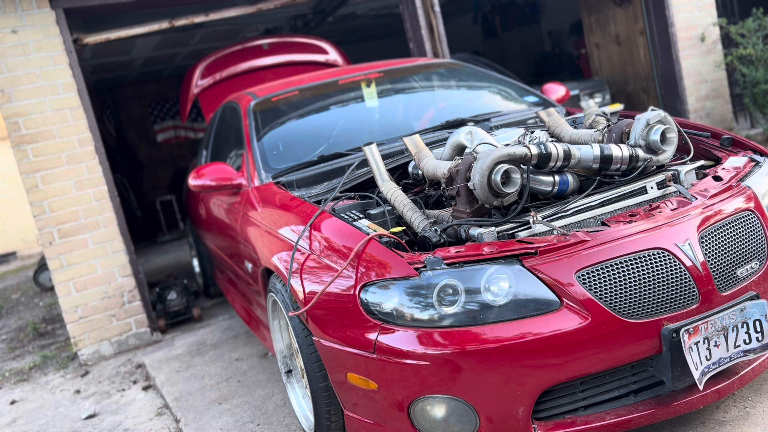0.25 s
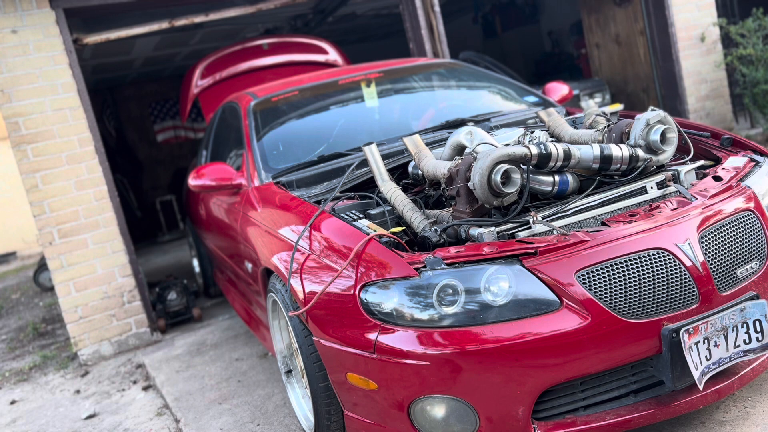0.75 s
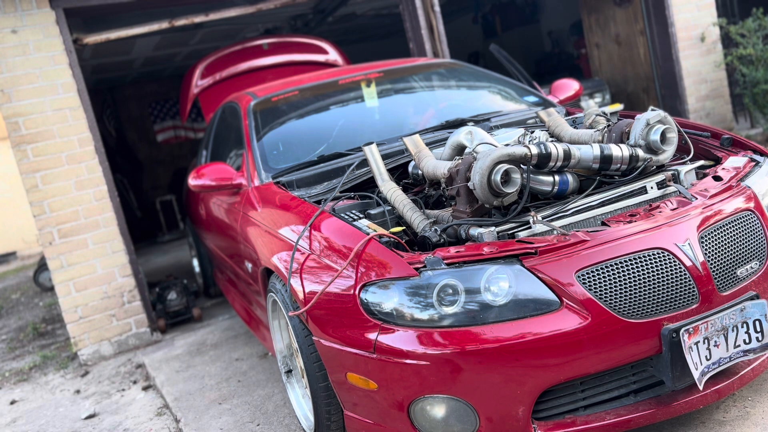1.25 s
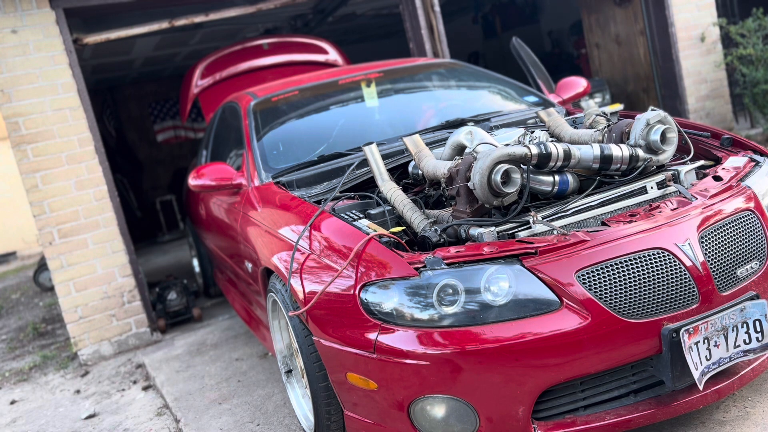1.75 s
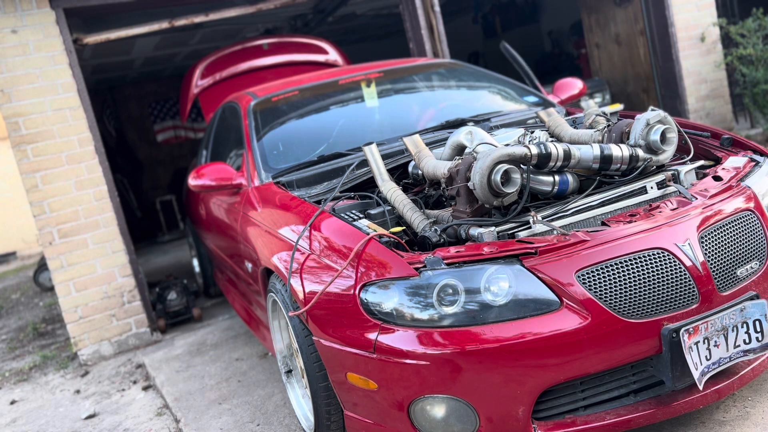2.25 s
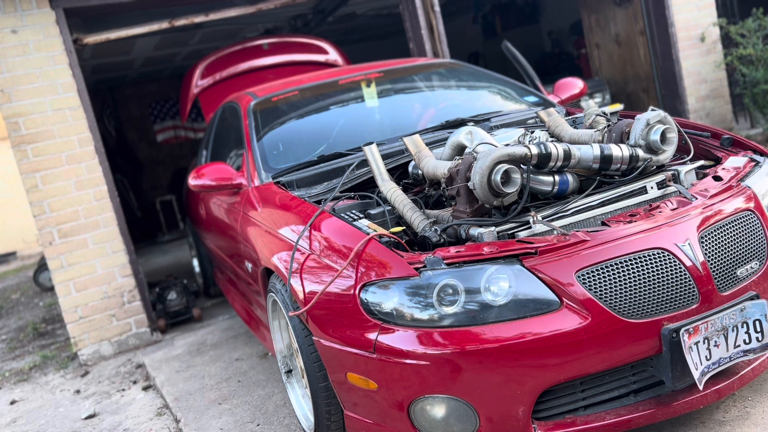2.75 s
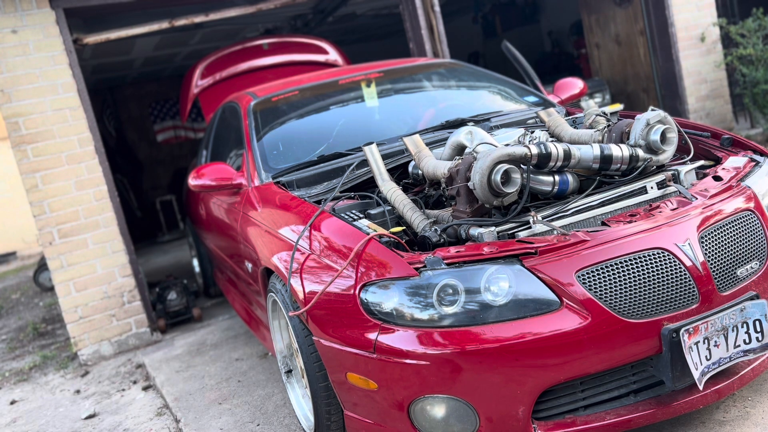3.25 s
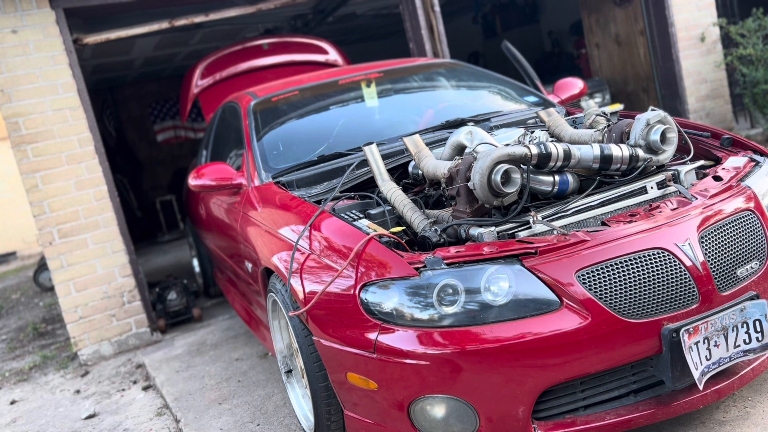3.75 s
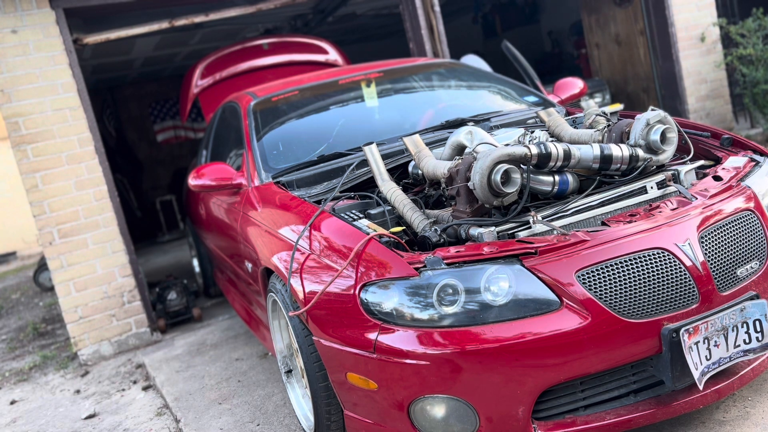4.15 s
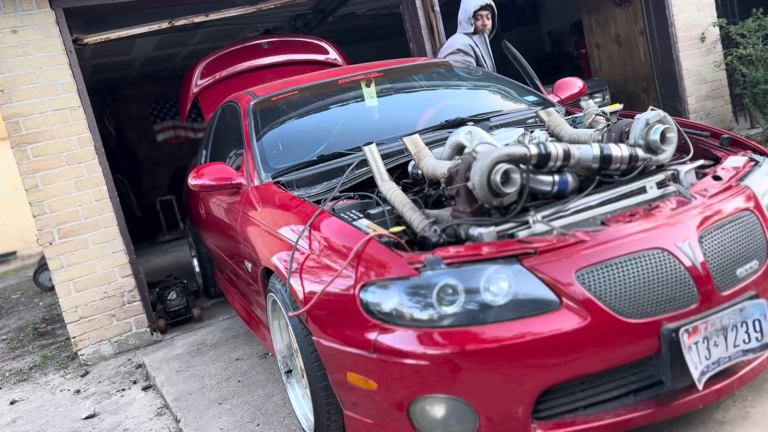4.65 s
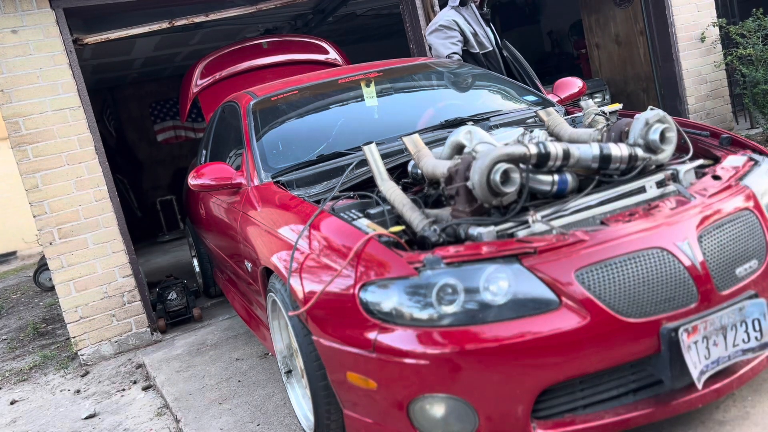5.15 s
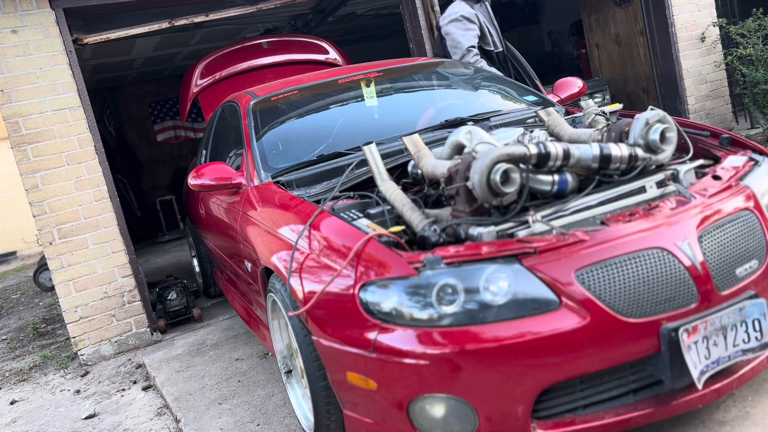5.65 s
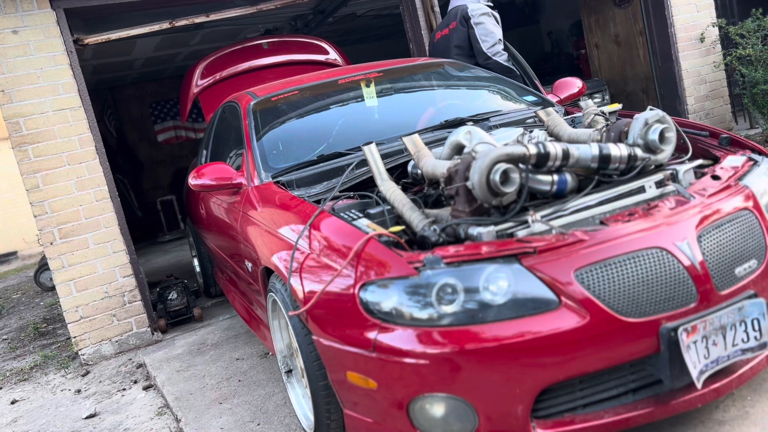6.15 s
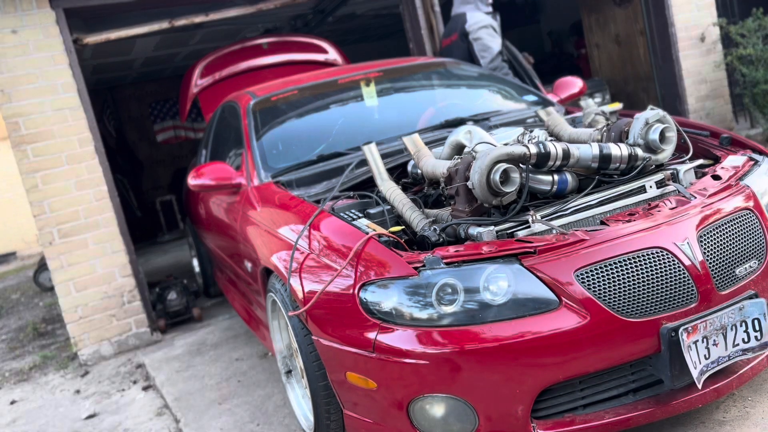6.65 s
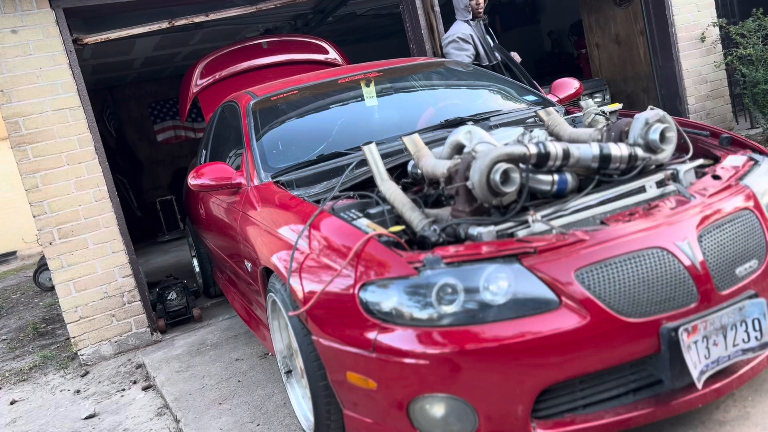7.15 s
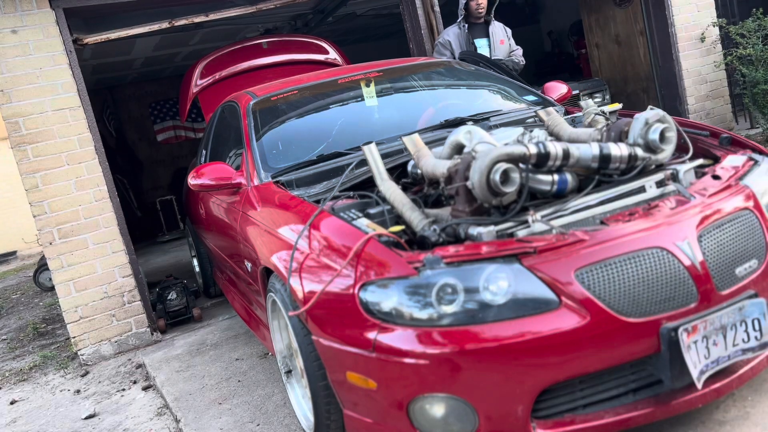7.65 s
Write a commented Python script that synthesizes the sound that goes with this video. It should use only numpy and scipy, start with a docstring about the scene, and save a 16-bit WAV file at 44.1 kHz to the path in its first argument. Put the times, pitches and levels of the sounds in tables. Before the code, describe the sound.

Lumpy idle of a big turbo car engine, thumping and barking from open pipes, sagging briefly and then growing louder.

```python
"""Dry barks and deep thumps in a lumpy rhythm: a turbocharged V8 idles in front of a garage, a few metres
away. The near cylinders bark out of open upswept pipes, ringing the sheet metal, and slugs of gas thump
behind the barks. One cylinder thumps deepest and often misfires; the far bank fills in between.
Underneath lie turbulent rumble, gas hiss, valve ticks and a faint whistle. The idle sags, then catches
and grows louder. Two microphone ports share the bass but hear the treble apart."""
import sys
import numpy as np
from scipy import signal
from scipy.fft import rfft, irfft
from scipy.io import wavfile
from scipy.ndimage import uniform_filter1d

SR = 44100
rng = np.random.default_rng(int(sys.argv[2]) if len(sys.argv) > 2 else 0)


def output_pcm(signal):
    """Save a mono or channel-first signal as 16-bit PCM at the path in sys.argv[1].

    Samples are clipped to [-1, 1] before scaling.
    """
    pcm = np.clip(np.atleast_2d(signal).T, -1, 1) * 32767
    wavfile.write(sys.argv[1], SR, np.round(pcm).astype(np.int16))


N = 348390
T = np.arange(N) / SR
HZ = np.maximum(np.arange(N // 2 + 1) * SR / N, 1)

# the pace of the idle: t/s, four-stroke cycles done
CRANK_CYCLES = [(-.067, 0), (.718, 6), (1.12, 9), (1.404, 11), (1.883, 14), (2.031, 15), (2.17, 16),
                (3.184, 24), (4.335, 33), (4.722, 36), (6.256, 48), (6.638, 51), (7.016, 54), (8.008, 62)]
# engine load, the two faders most layers ride on: t/s, rumble level/dB, gas flow level/dB
ENGINE_LOAD = [(0.0, -25, -40), (1.08, -27, -47), (1.21, -27, -45), (1.56, -32, -46.5), (1.72, -28, -42),
               (2.27, -21.5, -38), (5.74, -20, -37.5), (6.2, -19.5, -37), (7.9, -18, -36)]
# the clearest barks at the pipe mouths: t/s, level/dB, ring f/Hz
CLEAR_BARKS = [(0.0843, -18.5, 1600), (0.1328, -23, 1480), (0.1845, -31.5, 2450), (0.2537, -39.5, 1770),
               (0.2835, -52, 1510), (0.346, -24.5, 2500), (0.398, -21, 1560), (0.4305, -28, 1820),
               (0.5097, -33, 2000), (0.5251, -26, 1480), (0.5771, -33, 2420), (0.6072, -26.5, 1910),
               (0.659, -21, 1420), (0.694, -27, 1460), (0.78, -36.5, 1990), (0.824, -23.5, 2190),
               (0.8725, -36, 2220), (0.9218, -18, 1604), (0.9755, -30.5, 2300), (1.1307, -37, 1550),
               (1.175, -33, 1430), (1.197, -25, 1470), (1.252, -31.5, 2050), (1.3104, -37, 1460),
               (1.4182, -31, 1480), (1.49, -20, 1670), (1.6533, -19.5, 1440), (1.695, -30, 1714),
               (1.838, -32, 2120), (1.855, -22.5, 2100), (1.9095, -16, 1484), (2.0017, -24.5, 2140),
               (2.0543, -17, 1884), (2.108, -16, 1500), (2.14, -19.5, 2210), (2.2357, -15.5, 2400),
               (2.3045, -26, 1590), (2.3623, -15.5, 2510), (2.396, -18, 2160), (2.442, -14, 1660),
               (2.4895, -16.5, 1620), (2.539, -28.5, 2420), (2.618, -16, 1586), (2.6967, -15, 1484),
               (2.7424, -20.5, 1640), (2.7784, -22.5, 2420), (2.823, -16, 2000), (2.871, -15, 2420),
               (2.9046, -23.5, 2230), (2.9701, -43, 1430), (2.9959, -16.5, 1470), (3.0728, -19, 1930),
               (3.1233, -16.5, 1700), (3.1575, -20.5, 2380), (3.202, -14.5, 2110), (3.2504, -22, 1930),
               (3.284, -25.5, 2110), (3.379, -15.5, 2040), (3.449, -21.5, 2530), (3.5402, -24, 2460),
               (3.588, -14, 1900), (3.6359, -16, 1495), (3.713, -21.5, 1640), (3.763, -16.5, 2370),
               (3.795, -21, 1650), (3.8807, -23, 1430), (3.924, -22.5, 2250), (3.969, -17, 1520),
               (4.0176, -17, 2330), (4.101, -16, 1960), (4.15, -19.5, 1880), (4.181, -22, 2100),
               (4.2121, -26, 1470), (4.2738, -15.5, 1490), (4.309, -19.5, 2340), (4.343, -30.5, 2450),
               (4.4026, -15, 1650), (4.5331, -14, 2410), (4.586, -28, 1900), (4.639, -37, 1960),
               (4.6605, -22, 1970), (4.6946, -19.5, 2100), (4.788, -17, 2410), (4.9178, -16, 1830),
               (4.952, -21, 2230), (5.0467, -17, 1450), (5.097, -20.5, 2310), (5.124, -18.5, 2240),
               (5.171, -13.5, 2320), (5.253, -12.5, 1960), (5.298, -16, 1640), (5.366, -27, 1470),
               (5.427, -13.5, 1510), (5.462, -24, 1490), (5.555, -14.5, 1460), (5.592, -18.5, 2390),
               (5.717, -20, 2230), (5.7625, -12, 1665), (5.811, -13, 1460), (5.9394, -25, 1490),
               (5.9732, -22, 1570), (5.9908, -25, 2420), (6.0214, -30, 1600), (6.0686, -13, 2420),
               (6.1032, -20.5, 2270), (6.136, -18.5, 1760), (6.1953, -14.5, 1910), (6.243, -24, 2380),
               (6.2745, -17.5, 1520), (6.321, -20.5, 1445), (6.357, -26, 2020), (6.403, -12.5, 1986),
               (6.452, -14, 2390), (6.485, -18, 2500), (6.5186, -25.5, 1700), (6.599, -22.5, 1470),
               (6.628, -21, 1950), (6.6592, -19, 1540), (6.7042, -13, 2190), (6.7814, -10, 1535),
               (6.829, -16, 1700), (6.943, -26, 1470), (6.9576, -15, 1940), (6.988, -20, 2174),
               (7.019, -20.5, 1640), (7.061, -41, 1630), (7.0786, -19.5, 1540), (7.1292, -28, 2240),
               (7.1593, -10.5, 2100), (7.204, -14, 1490), (7.237, -22.5, 1470), (7.284, -12, 1447),
               (7.3497, -20.5, 1790), (7.4077, -11.5, 2000), (7.5319, -11.5, 1540), (7.5785, -14, 2210),
               (7.611, -20, 2440), (7.7204, -26, 2170), (7.752, -21, 2410), (7.7799, -11, 2125),
               (7.86, -23, 1820)]
# near cylinders when they burn poorly: place/eighths of a cycle, bark level/dB over the gas flow
SOFT_BARKS = [(1.2, -8), (4.2, 1), (6.29, 2), (7.29, 3)]
# far-bank pulses and echoes in the pipes: place/eighths of a cycle, level/dB over the rumble
FAR_PULSES = [(0.899, 5), (2.703, 6), (3.329, 11.5), (4.1, 4), (5.86, 7)]
# how well the far bank burns, cycle by cycle: gain/dB
FAR_BURN = [6, -2, 1.5, 2.5, 5.2, 6.5, 3.5, 0.5, 4.5, 6.5, 4.7, 7, 7, 5.5, 4, 4, 2, -5, -3, -5, -6, 2.5,
            0.5, 0, 1, -1, 1, -3.5, -5, 1, -6, 1.5, -3, -4, 1, 1.2, 2, 1.5, 2.5, -0.5, 2.5, -0.5, 0.5, -5,
            3.5, -0.5, -1, 3, 1, 0.5, -1.5, -.1, -1.5, 2, -4, -4, -2, -4, 1.5, -3, -4.5, -2]
# the deep cylinder cycle by cycle, low where it misfires: level/dB over the rumble
DEEP_BURN = [5, 18.4, 12, 9, 18, 9.9, 15.6, 20.5, 12, 19.4, 14.5, 16, 12, 16, 14, 18, 16, 13, 16.7, 16, 4.4,
             7.8, 8.7, 12.5, 18, 6.7, 11, 19.6, 3.5, 14, 15.7, 16.5, 15, 17, 14.4, 16.5, 5.9, 5.4, 16, 12,
             9.7, 13.6, 18.3, 9.4, 15, 17.8, 5.7, 15.3, 6.5, 4.9, 15.6, 11, 9.7, 19.8, 17, 5.5, 15.7, 8,
             5.1, 14.7, 6.6, 17.5]
# tone curves of the rumble, the barks and the gas hiss: f/Hz, relative level/dB
RUMBLE_EQ = [(40, -9), (60, -7), (110, -13), (160, -2), (200, -5.5), (320, -11), (420, -18.5), (520, -14.5),
             (690, -15), (720, -33), (1200, -45.5)]
BARK_EQ = [(400, -4), (800, -2), (1100, -3.5), (1500, -3.5), (2200, -1), (3000, -3.5), (4500, -9),
           (7500, -7), (10000, -11), (13000, -6.5), (16000, -12)]
FLOW_EQ = [(500, 11), (800, 13), (1500, 7), (2500, 2.5), (4000, -2), (7500, -3), (11000, -31), (16000, -41)]
# sheet-metal and pipe resonances that colour the gas: f/Hz, width/Hz, gain/dB
SHELL_PEAKS = [(785, 41, 9), (959, 38, 12), (1097, 66, 6.5), (1501, 150, 9.5), (1760, 160, -1.5),
               (2454, 110, 5), (2920, 80, 1.5), (3920, 96, 7), (8320, 3200, 5)]
# hollow body of the exhaust, rung by every firing: f/Hz, level/dB, t60/s
BODY_MODES = [(156.1, -16, 0.32), (229, -27, 0.041), (281, -19, 0.078), (343.3, -23, 0.13),
              (484, -16, 0.077), ]
# sheet metal rung by each bark: f/Hz, width/Hz, level/dB
PANEL_MODES = [(955, 33, -15.5), (1080, 60, -12), (1530, 50, -10)]
# how alike the two microphone ports sound: f/Hz, likeness from 0 to 1
PORT_LIKENESS = [(60, .999), (300, .97), (600, .82), (1200, .72), (2000, .68), (3000, .5), (6000, .3),
                 (7500, .4), (8500, .75), (10000, .9), (16000, .9)]
# left port over right: f/Hz, level/dB
PORT_BALANCE = [(30, -3), (60, 0.6), (110, -2.5), (200, -2), (380, -3), (700, -3), (1290, 0.5), (2380, -4),
                (4400, 4.5), (8120, 0), (15000, -0.5)]
# left port ahead of right: f/Hz, phase/rad
PORT_PHASE = [(30, 0), (120, -.1), (520, -.4), (780, 2.9), (1300, 3.8), (2000, 6.2), (2700, 8.6),
              (3500, 8.2), (4500, 13), (7000, 14.6), (8500, 12.6), (10300, 9.42), (12000, 6.28),
              (13800, 3.14), (15500, 0)]


def undb(db):
    """Gain of a level in dB."""
    return 10 ** (np.asarray(db) / 20)


def curve(table):
    """A (f/Hz, value) table drawn across the spectrum on a log axis."""
    hz, value = np.transpose(table)
    return np.interp(np.log(HZ), np.log(np.maximum(hz, 1)), value)


def peak(hz, width_hz):
    """Gain spectrum of one resonance."""
    return 1 / (1 + (2 * (HZ - hz) / width_hz) ** 2)


def noise(gain):
    """Noise with the given gain spectrum, rms 1."""
    x = irfft(rfft(rng.standard_normal(N)) * gain, N)
    return x / x.std()


def wander(rate_hz):
    """A smooth random wobble with a spread near 1."""
    hold = int(SR / rate_hz)
    steps = np.repeat(rng.standard_normal(N // hold + 1), hold)
    return 1.44 * uniform_filter1d(uniform_filter1d(steps, hold), hold)[:N]


def strike(times, gains, shape):
    """The shape triggered at each time with its gain."""
    train, at = np.zeros(N), (np.asarray(times) * SR).astype(int)
    inside = (at >= 0) & (at < N)
    np.add.at(train, at[inside], gains[inside])
    return signal.fftconvolve(train, shape)[:N]


def ring(envelope, hz, width_hz):
    """A noise burst through one resonance, with the energy of its envelope."""
    band = signal.butter(1, [hz - width_hz / 2, hz + width_hz / 2], "band", fs=SR)
    tone = signal.lfilter(*band, envelope * rng.standard_normal(len(envelope)))
    return tone * np.sqrt(np.sum(envelope ** 2) / np.sum(tone ** 2))


def crank_times(eighths):
    """When the crank passes the given places, one row a cycle."""
    crank_s, cycles = np.transpose(CRANK_CYCLES)
    return np.interp(np.arange(cycles[-1])[:, None] + eighths / 8, cycles, crank_s, left=-1)


def shell():
    """Gain spectrum of the metal and pipes around the gas."""
    return undb(sum(db * peak(hz, width) for hz, width, db in SHELL_PEAKS))


def whistle():
    """A faint steady whistle, perhaps a pump."""
    return undb(-61) * noise(peak(5200, width_hz=300))


def gas_hiss(envelope):
    """Flowing exhaust gas, coloured by the metal around it."""
    return envelope * noise(undb(curve(FLOW_EQ)) * shell())


def valve_hiss(floor=0):
    """A broad metallic midrange hiss; the floor opens up its lows and highs."""
    return noise((peak(2120, width_hz=2900) + floor) * shell())


def valve_ticks(flow_db):
    """Valve gear and injectors tick eight times a cycle, a few much louder: hiss envelope, and rings."""
    low_hz, high_hz, t60_s, scatter_db = 1420, 5470, .05, 5.5
    at = crank_times(np.arange(8) + .24).ravel()
    gains = undb(np.interp(at, T, flow_db) - 2.5 + scatter_db * rng.standard_normal(len(at)))
    pitches = low_hz * (high_hz / low_hz) ** rng.random(len(at)) ** 1.67
    t = T[:int(.05 * SR)]
    shape = (1 - np.exp(-t / .003)) * undb(-60 * t / t60_s)
    rings = np.zeros(N + len(t))
    for start, gain, hz in zip(at, gains, pitches):
        if 0 <= start < T[-1]:
            rings[int(start * SR):][:len(t)] += gain * np.sqrt(low_hz / hz) * ring(shape, hz, width_hz=220)
    return strike(at, gains, shape), undb(-5) * rings[:N]


def rumble(rumble_db, thumps):
    """Turbulence in pipes and turbines, swelling with each firing."""
    swell = uniform_filter1d(np.abs(thumps), size=500)
    pumping = .51 + .86 * swell / uniform_filter1d(swell, size=SR // 2)
    return noise(undb(curve(RUMBLE_EQ))) * pumping * undb(rumble_db - 7.5 + .16 * wander(11))


def exhaust_body():
    """The hollow modes of the exhaust bloom as a slug of gas leaves."""
    t = T[:int(.1 * SR)]
    modes = sum(undb(db - 60 * t / t60) * np.sin(2 * np.pi * hz * t) for hz, db, t60 in BODY_MODES)
    return (1 - np.exp(-t / .011)) * modes


def pipe_knock(hz=176, lag_s=.01154, half_length_s=.0044):
    """A short hollow knock of the pipe between bark and thump."""
    t = T[:int(.03 * SR)] - lag_s
    return undb(-11) * np.exp(-(t / half_length_s) ** 2) * np.cos(2 * np.pi * hz * t)


def gas_slug(slug_hz=86, slug_s=.0031, pipe_hz=71.6, rise_s=.26, t60_s=.3):
    """A slug of gas swings the pipe once and a half; a faint hum grows behind it. Peak 1."""
    t = T[:int(.09 * SR)]
    slug = (t / slug_s) ** 3 * np.exp(-t / slug_s) * np.cos(2 * np.pi * slug_hz * t)
    hum = undb(-6 - 60 * t / t60_s) * (1 - np.exp(-t / rise_s)) * np.sin(2 * np.pi * pipe_hz * t)
    return (slug + hum) / np.max(slug + hum)


def far_and_deep_pulses(rumble_db, near_s, first_thump_db):
    """Times and levels of the far bank's pulses and, in the last column, of the deep cylinder."""
    deep_place = 7.84
    place, over_db = np.transpose(FAR_PULSES + [(deep_place, 0)])
    at = crank_times(place)
    even_s = crank_times(np.transpose(SOFT_BARKS)[0]).ravel()
    at = at + np.interp(at, even_s, near_s.ravel() - even_s)  # push and drag with the near bank
    base_db = np.interp(at, T, rumble_db)
    accent_db = first_thump_db - base_db[:, :1]  # the far bank leans on the first near thump
    db = base_db + over_db
    db[:, :-1] += .1 * (accent_db - accent_db.mean()) + np.array(FAR_BURN)[:, None]
    db[:, -1] += DEEP_BURN
    return at, db


def exhaust_thumps(rumble_db, near_s, bark_db, lag_s=.01164, jitter_s=.0005, scatter_db=1.6):
    """The low beat: slugs of gas behind three near cylinders' barks, the far bank and the deep cylinder."""
    bark_s = near_s[:, :3]
    thump_db = -7 + .46 * (bark_db[:, :3] + 15)  # a harder bark brings a heavier thump
    pulse_s, pulse_db = far_and_deep_pulses(rumble_db, near_s, thump_db[:, :1])
    at, db = np.hstack([bark_s + lag_s, pulse_s]), np.hstack([thump_db, pulse_db])
    chance = rng.standard_normal(at.shape + (2,))
    times = (at + jitter_s * chance[..., 1]).ravel()
    gains = undb(db + scatter_db * chance[..., 0]).ravel()
    body_lag_s = .00576 + .00159 * rng.standard_normal(len(times))
    knocks = strike(bark_s.ravel(), undb(thump_db).ravel(), pipe_knock())
    return strike(times, gains, gas_slug()) + strike(times + body_lag_s, gains, exhaust_body()) + knocks


def near_bank(flow_db, scatter_db=3):
    """Bark cues (t/s, level/dB, f/Hz), soft ones filling the gaps; then each firing's time and level."""
    clear_s, clear_db, clear_hz = np.transpose(CLEAR_BARKS)
    place, over_db = np.transpose(SOFT_BARKS)
    at = crank_times(place)
    soft_db = over_db + np.interp(at, T, flow_db) + scatter_db * rng.standard_normal(at.shape)
    soft_hz = rng.uniform(1450, 2450, at.shape)
    apart_s = np.abs(at[..., None] - clear_s)
    nearest, clear = apart_s.argmin(axis=-1), apart_s.min(axis=-1) <= .013
    at = at + np.interp(at, at[clear], (clear_s[nearest] - at)[clear])  # early or late with the barks
    soft = ~clear & (at > 0) & (at < T[-1])
    cues = np.hstack([[clear_s, clear_db, clear_hz], [at[soft], soft_db[soft], soft_hz[soft]]])
    return cues, at, np.where(clear, clear_db[nearest], soft_db)


def pipe_pings(times, db, ring_hz, rise_s=.003, t60_s=.06):
    """The pipe mouth pings: a clear metallic note inside each bark."""
    t, out = T[:SR // 20], np.zeros(N + SR // 20)
    shape = (1 - np.exp(-(t / rise_s) ** 2)) * undb(-2 - 60 * t / t60_s)
    for start, level_db, hz, phase in zip(times - rise_s / 2, db, ring_hz, rng.random(len(times))):
        out[int(start * SR):][:len(t)] += undb(level_db) * shape * np.sin(2 * np.pi * (hz * t + phase))
    return out[:N]


def bark_rings(crack, main_hz, second_hz, sizzle_hz):
    """What one crack of gas sets ringing: two pitches, a thin sizzle and the sheet metal."""
    sizzle = undb(-13) * sum(ring(crack, hz, width_hz=90) for hz in sizzle_hz)
    main = undb(-3) * ring(crack, main_hz, width_hz=260)
    second = undb(-5) * ring(crack, second_hz, width_hz=260)
    panels = sum(undb(db) * ring(crack, hz, width) for hz, width, db in PANEL_MODES)
    return main + second + sizzle + panels


def barks(times, db, ring_hz, second_hz, sizzle_hz):
    """Gas bursts from the pipe mouth: a small leak, a dry ringing crack, then a duller tail."""
    leak_s, crack_s, tail_t60_s, treble_hz, tail_hz = .011, .0058, .11, 3060, 7140
    times, db, t = times - .003, db - 3.5, T[:int(.2 * SR)]
    crack = (t / crack_s) ** .74 * np.exp(-(t / crack_s) ** 2 / 2)
    tail = (1 - np.exp(-t / .0072)) * undb(3 - 60 * t / tail_t60_s)
    colour, treble = undb(curve(BARK_EQ)) * shell(), 1 / (1 + (treble_hz / HZ) ** 4)
    treble_db = db + 1 + .44 * (db - db.max())  # strong barks are brighter
    gas = rfft(noise(colour))
    out = irfft(gas * (1 - treble), N) * strike(times, undb(db), crack)
    out += irfft(gas * treble, N) * strike(times, undb(treble_db), crack)
    out += noise(colour / (1 + (HZ / tail_hz) ** 2)) * strike(times, undb(db), tail)
    out += valve_hiss() * strike(times - leak_s, undb(db - 17), np.hanning(int(2 * leak_s * SR)))
    for start, level_db, *pitches in zip(times, db, ring_hz, second_hz, sizzle_hz):
        tone = bark_rings(crack[:SR // 20], *pitches)
        at = int(max(start, 0) * SR)
        out[at:at + len(tone)] += undb(level_db) * tone[:N - at]
    return out


def microphone_ports(left, other):
    """Stereo width: the right port blends the left's sound with other turbulence, offset in tone and phase."""
    left, likeness = rfft(left), curve(PORT_LIKENESS)
    right = likeness * left + np.sqrt(1 - likeness ** 2) * rfft(other)
    pan, lag = undb(curve(PORT_BALANCE) / 2), np.exp(-1j * curve(PORT_PHASE))
    return np.array([irfft(left * pan, N), irfft(right / pan * lag, N)])


def scene():
    """The idling engine in stereo; turbulence is made twice, since the ports share it only in part."""
    load_s, *faders = np.transpose(ENGINE_LOAD)
    rumble_db, flow_db = (np.interp(T, load_s, fader) for fader in faders)
    cues, near_s, bark_db = near_bank(flow_db)
    thumps = exhaust_thumps(rumble_db, near_s, bark_db)
    tick_envelope, tick_rings = valve_ticks(flow_db)
    gas_envelope = undb(flow_db + 2.5 + 3.53 * wander(60) + 1.02 * wander(24.974))
    sizzle_hz = 1000 * 9 ** rng.random((cues.shape[1], 4))
    second_hz = rng.uniform(1400, 3300, cues.shape[1])
    turbulence, other = (whistle() + gas_hiss(gas_envelope) + tick_envelope * valve_hiss(floor=.027)
                         + rumble(rumble_db, thumps) + barks(*cues, second_hz, sizzle_hz)
                         for _ in range(2))
    return microphone_ports(turbulence + tick_rings + thumps + pipe_pings(*cues), other)


def record(dry):
    """The phone cuts the deepest bass, rounds the loudest peaks and cuts the top."""
    low_hz, top_hz, ceiling = 40, 15800, 1.15
    trimmed = signal.sosfiltfilt(signal.butter(2, low_hz, "high", fs=SR, output="sos"), dry)
    rounded = ceiling * np.tanh(trimmed / ceiling)
    return signal.sosfilt(signal.ellip(10, .2, 80, top_hz, fs=SR, output="sos"), rounded)


dry = scene()
out = record(dry)
output_pcm(out)
```